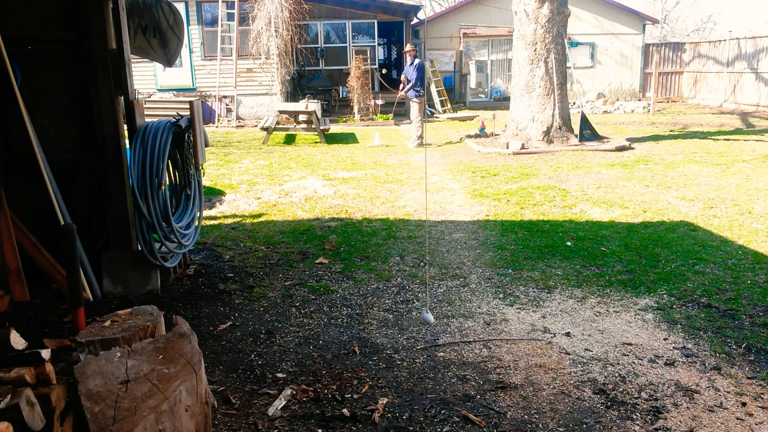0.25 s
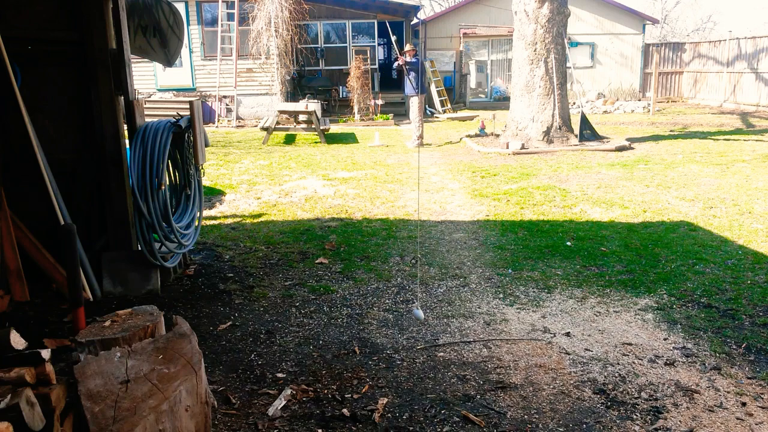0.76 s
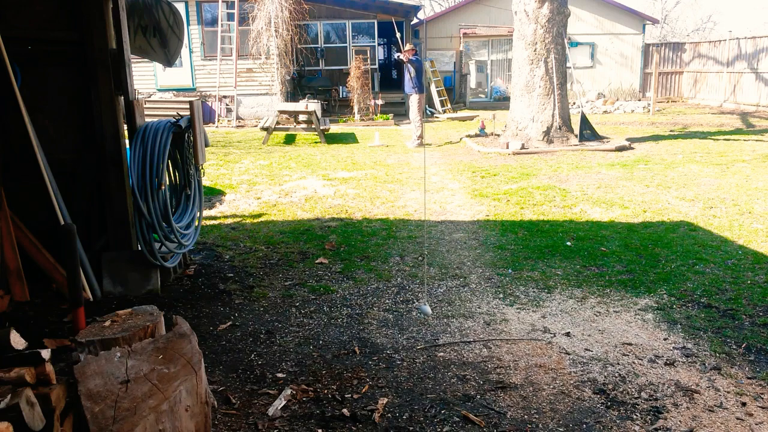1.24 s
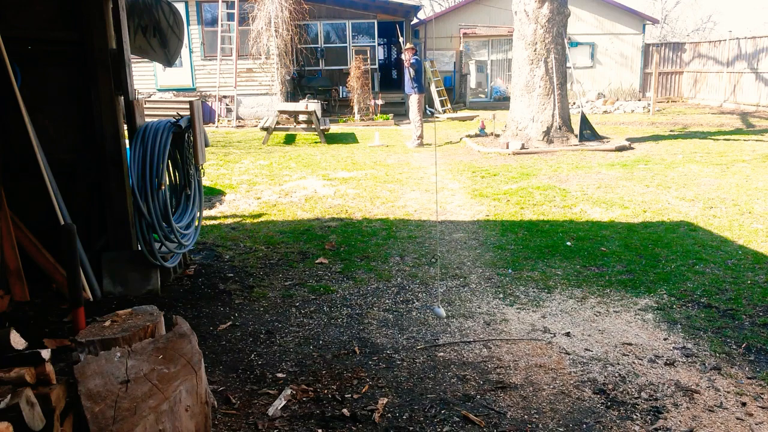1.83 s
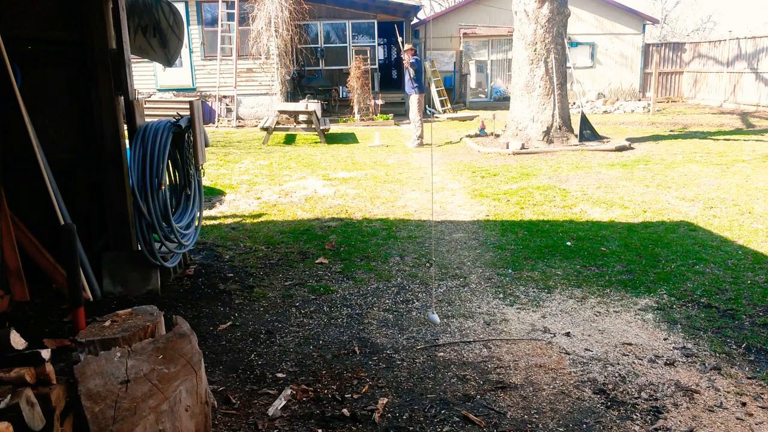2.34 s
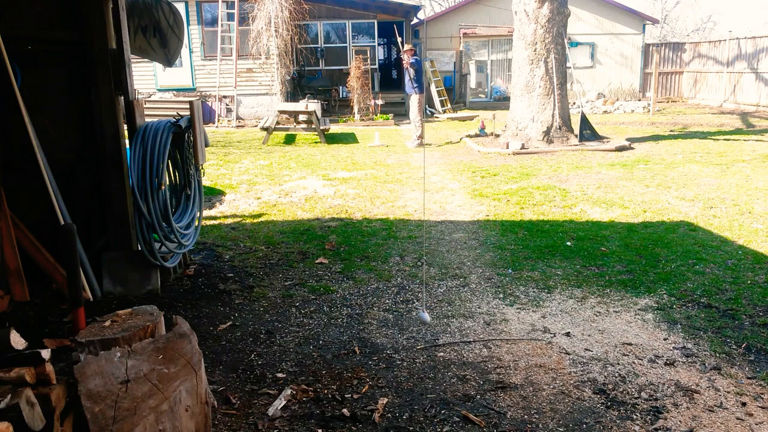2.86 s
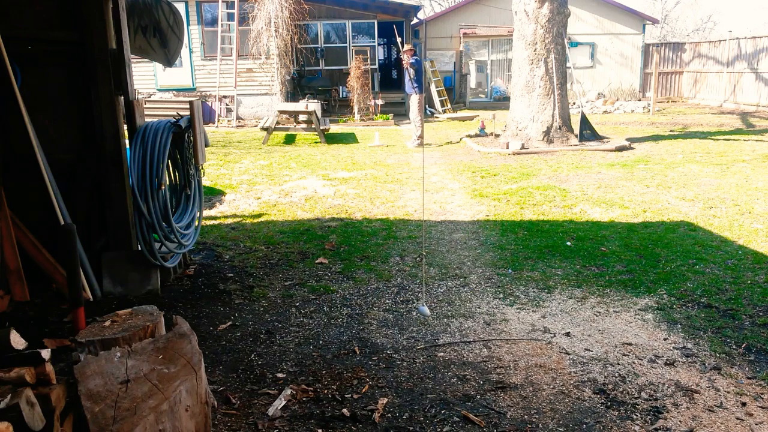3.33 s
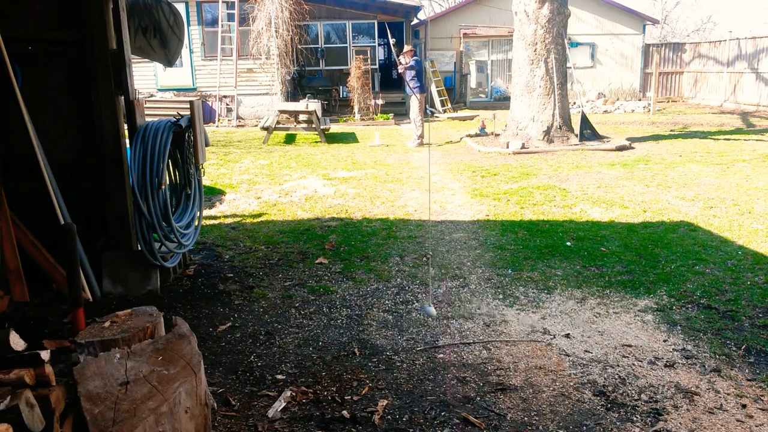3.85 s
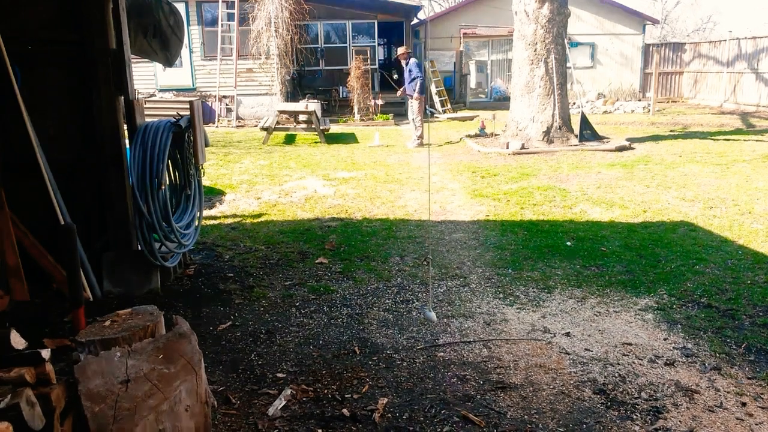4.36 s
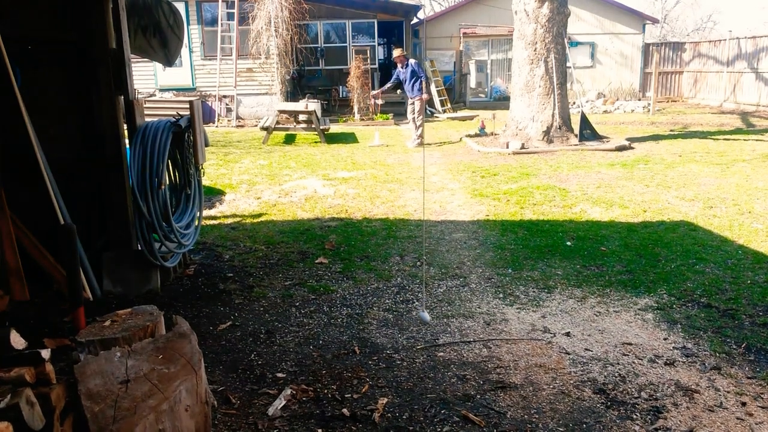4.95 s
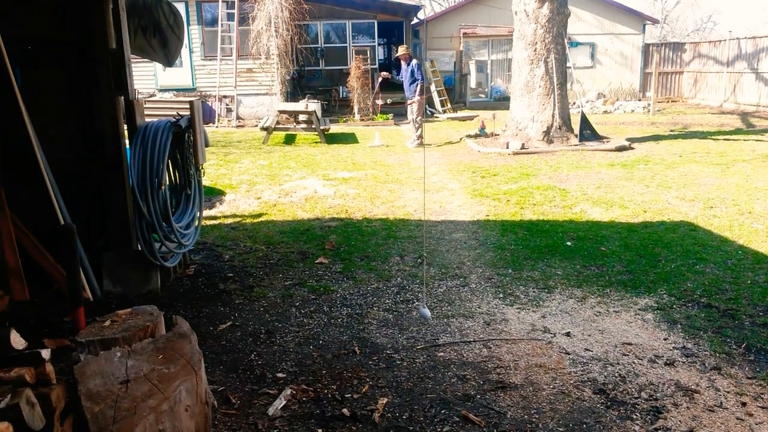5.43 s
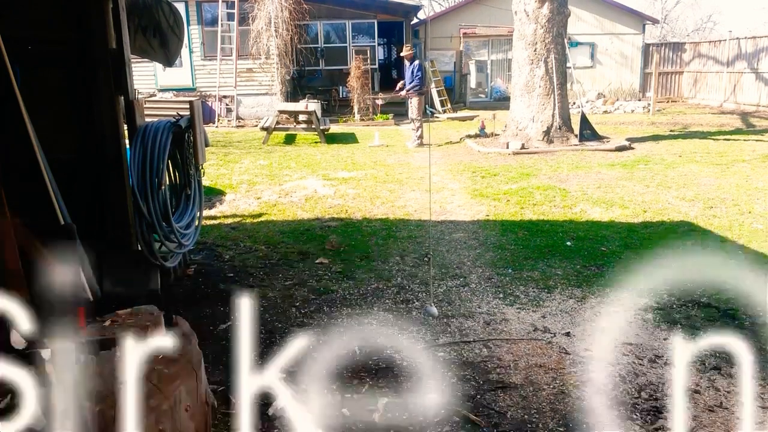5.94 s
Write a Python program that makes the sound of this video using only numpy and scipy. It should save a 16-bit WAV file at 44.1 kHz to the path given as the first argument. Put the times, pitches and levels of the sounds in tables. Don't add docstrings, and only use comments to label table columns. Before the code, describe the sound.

From 0 to 3.7 seconds the yard is very quiet: low distant traffic, a light breeze in leaves, faint rustles, sparse high chirps and squeaks, a soft dove coo from about 2.1 and a hoarse chirp near 2.8. At 3.77 a bow recoils across the yard with a dry string slap. A feathery hiss with a humming shaft swells quickly until 3.95, when the arrow strikes a board beside the microphone: an extremely loud, sharp thud and splintering crack, with a tiny metallic ring and scraping shriek, over within a tenth of a second. Shed walls boom and decay until about 4.5. The board knocks as it rocks, with a clack at 4.09 and a startled bird squeaking and trilling. Grit and dust tick down around 4.2 to 4.8. The dove coos at 4.25 and 4.95, a light tick falls at 5.3, and a last thin bird squeak comes near 5.95.

```python
import sys
import numpy as np
from scipy import signal
from scipy.fft import rfft, irfft, next_fast_len
from scipy.io import wavfile
from scipy.ndimage import uniform_filter1d, map_coordinates

SR = 44100
rng = np.random.default_rng(int(sys.argv[2]) if len(sys.argv) > 2 else 0)


def master_out(mix):
    frames = np.transpose(np.atleast_2d(mix))
    ceiling = np.clip(frames, -1, 1)
    pcm = np.round(ceiling * 32767).astype(np.int16)
    wavfile.write(sys.argv[1], SR, pcm)


def gain_from_db(level_db):
    decades = np.asarray(level_db, float) / 20
    return 10 ** decades


N = 273175
T = np.arange(N) / SR


def unit(x):
    return x / np.sqrt(np.mean(x ** 2) + 1e-20)


def along(points, hz):
    f, v = np.transpose(points)
    return np.interp(np.log(hz + 1), np.log(f + 1), v, right=v[-1])


def curve(points):
    s, v = np.transpose(points)
    return np.interp(T, s, v)


def wobble(rate_hz, size=N):
    knots = rng.standard_normal(int(size * rate_hz / SR) + 4)
    return map_coordinates(knots, [np.arange(size) * rate_hz / SR])


def filtered(x, response):
    m = next_fast_len(N + SR // 2)
    return irfft(rfft(x, m) * response(np.fft.rfftfreq(m, 1 / SR)), m)[..., :N]


def pan(x, left_db):
    return np.array([x * gain_from_db(left_db / 2), x * gain_from_db(-left_db / 2)])


def rush(spectrum, alike, patchy_db):
    z = signal.stft(rng.standard_normal((2, N)), nperseg=512)[2]
    patches = uniform_filter1d(rng.standard_normal(z.shape[1:]), 6, 0)
    patches = unit(uniform_filter1d(patches, 10, 1))
    pair = signal.istft(z * gain_from_db(patchy_db * patches), nperseg=512)[1][:, :N]
    closed = [(10, -120), *spectrum, (spectrum[-1][0] + 900, -120)]

    def mid_side(hz):
        turn = np.arccos(np.clip(along(alike, hz), -1, 1)) / 2
        return gain_from_db(along(closed, hz)) * [np.cos(turn), np.sin(turn)]

    mid, side = filtered(pair, mid_side)
    return unit(np.array([mid + side, mid - side]))


def bursts(rows):
    out = np.zeros(N + SR)
    for s, db, rise, t60, length in rows:
        t = np.arange(round(length * SR)) / SR
        stop = np.clip((length - t) / .0025, 0, 1)
        out[round(s * SR):][:len(t)] += gain_from_db(db - 60 * t / t60) * (1 - np.exp(-t / rise)) * stop
    return out[:N]


def tone(hz, s):
    return np.sqrt(2) * np.sin(2 * np.pi * np.cumsum(hz + 0 * s) / SR)


def notes(rows, rough, left_db):
    out = np.zeros((2, N))
    for s, length, first_hz, last_hz, db in rows:
        n = round(length * SR)
        hz = np.linspace(first_hz, last_hz, n) * (1 + rough * wobble(299.5, size=n))
        swell = signal.windows.tukey(n, min(1, .03 / length))
        swell = swell * gain_from_db(db + 1 + 2.5 * wobble(45, size=n))
        out[:, round(s * SR):][:, :n] += pan(swell * tone(hz, 0), left_db)
    return out


# time in seconds, level in dB.
BREEZE = [(0.0, -57.5), (.67, -59), (.86, -59.5), (1.05, -58), (1.36, -59), (2.0, -57), (2.15, -56),
          (2.31, -59), (2.98, -59), (3.62, -57.5), (5.0, -58.5), (5.4, -56.5), (5.79, -59.5), (5.98, -57),
          (6.19, -56.5)]
# frequency in Hz, left-right correlation.
ALIKE = [(60, 0.99), (180, 0.98), (550, 0.72), (1650, -0.014), (4970, -0.12), (15000, 0.02)]
# frequency in Hz, density in dB per Hz.
TRAFFIC = [(20, -27), (45, -4.5), (70, -0.5), (250, -2), (500, -8.5), (1000, -9.5), (1600, -21.5),
           (3000, -32.5)]
# start in s, level in dB, rise in s, t60 in s, length in s.
ECHO_LOW = [
    (3.5, -53.5, .03, 1.5, 0.25),
    (3.99, -45.5, .03, 1.3, 1),
    (3.96, -54.5, .05, 18, 1.9),
]
# frequency in Hz, density in dB per Hz.
ECHO_TONE = [(40, -20), (90, -0.5), (130, -1), (250, 0.5), (420, -8), (800, -10), (1600, -26.5)]


def traffic():
    road = gain_from_db(curve(BREEZE) + 1 + .4 * wobble(7.7)) * rush(TRAFFIC, [(28, .2), *ALIKE], patchy_db=1.5)
    out = road + bursts(ECHO_LOW) * rush(ECHO_TONE, ALIKE, patchy_db=1.5)
    out[1] = np.roll(out[1], shift=12)
    return out


# frequency in Hz, density in dB per Hz.
LEAVES = [(700, -20), (1500, -1.5), (3000, 2.5), (5000, -2.5), (8000, -3.5), (11000, -5), (14300, -7),
          (14700, -14), (15600, -13.5)]
# start in s, level in dB, rise in s, t60 in s, length in s.
ECHO_HIGH = [
    (3.86, -46, .06, 3.0, .1),
    (3.93, -42.5, .01, 0.77, .4),
    (3.96, -53, .02, 3.6, 1.5),
]


def leaves():
    breeze_db = curve(BREEZE)
    mean_db = breeze_db.mean()
    stir_db = mean_db - 9.5 + 1.2 * (breeze_db - mean_db)
    level = np.hypot(gain_from_db(stir_db), bursts(ECHO_HIGH))
    return level * gain_from_db(.6 * wobble(9)) * rush(LEAVES, ALIKE, patchy_db=1.3)


# start in s, level in dB, rise in s, t60 in s, length in s.
RUSTLE = [(2.08, -58, 0.075, 1.05, 0.29), (2.8, -56, 0.0048, 0.2, 0.06), (1.6, -64, .08, 1.5, .38),
          (3.36, -64, 0.042, 0.7, 0.14), (4.7, -57.5, 0.056, 1.4, 0.26), (5.25, -64, .06, 0.58, .2),
          (.84, -68, 0.033, 0.89, 0.43)]
# frequency in Hz, density in dB per Hz.
RUSTLE_TONE = [(800, -20), (1800, -2.5), (3000, -1.5), (4500, -3), (7000, -16), (10000, -13), (15000, -20)]


def rustles():
    return bursts(RUSTLE) * gain_from_db(2.2 * wobble(60)) * rush(RUSTLE_TONE, [(1000, 0.224)], patchy_db=3)


# start in s, length in s, first Hz, last Hz, level in dB.
LEFT_BIRDS = [(.16, 0.049, 4290, 4080, -67), (.89, .06, 2740, 2830, -77), (1.03, 0.057, 4260, 4280, -68),
              (1.13, 0.19, 5860, 5800, -79), (1.24, .05, 3740, 3800, -73), (1.95, .028, 3420, 3440, -71),
              (2.1, 0.11, 4160, 4360, -80), (5.16, 0.11, 4160, 4140, -70)]
# start in s, length in s, first Hz, last Hz, level in dB.
FAR_BIRDS = [(.27, 0.042, 4330, 4520, -72), (.88, .08, 3100, 3130, -79), (1.13, .1, 4260, 4280, -78),
             (1.645, 0.05, 2050, 1920, -70), (1.77, .2, 2710, 2620, -74), (1.85, .08, 2680, 2640, -74),
             (1.67, .07, 1900, 1990, -75), (1.9, .037, 9790, 9570, -76), (1.92, 0.023, 2090, 2060, -68),
             (2.22, .1, 2680, 2740, -79), (4.325, .025, 8450, 8400, -73), (4.365, .05, 8400, 8440, -74),
             (4.83, .04, 2470, 2510, -70), (4.845, .029, 3000, 3130, -68.5),
             (5.16, .15, 9950, 10020, -75.5)]
# start in s, length in s, first Hz, last Hz, level in dB.
CLEAR_BIRDS = [(2.8, .24, 1527, 1526, -81.5), (2.84, 0.127, 3280, 3200, -78),
               (2.775, 0.31, 3030, 3015, -76), (2.775, .31, 4560, 4500, -80), (3.0, .085, 4520, 4500, -76),
               (2.89, .11, 4850, 4900, -84), (5.9, .045, 6700, 6230, -79), (5.985, .06, 2950, 3480, -75),
               (6.04, .14, 3500, 3680, -81)]
# start in s, length in s, first Hz, last Hz, level
# in dB.
CHATTER = [(.03, 0.12, 255.3, 239.6, -59.5), (1.58, 0.057, 1700, 1790, -76), (1.98, 0.16, 3350, 2780, -77),
           (2.08, 0.21, 3050, 3300, -73.5), (2.1, 0.085, 3650, 3500, -72), (2.08, 0.14, 2600, 2600, -71.5),
           (2.795, 0.044, 2650, 2610, -61), (2.795, 0.04, 3050, 3040, -59), (2.795, 0.04, 3400, 3420, -67),
           (2.8, 0.035, 4550, 4530, -71), (2.8, 0.059, 6810, 6680, -77), (2.797, 0.044, 7840, 7600, -78),
           (4.105, 0.12, 2620, 2596, -68), (5.22, 0.147, 5760, 5730, -74), (6.06, .035, 2496, 2466, -72.5)]


def small_birds():
    left = notes(LEFT_BIRDS, rough=.005, left_db=13.0)
    far = notes(FAR_BIRDS, rough=0.013, left_db=3.0)
    clear = notes(CLEAR_BIRDS, rough=0.0035, left_db=4.0)
    hoarse = notes(CHATTER, rough=.03, left_db=2.5)
    return left + far + clear + hoarse


# start in s, length in s, first Hz, last Hz, level in dB.
DOVE = [
    (2.06, .22, 422, 419, -67.5),
    (2.3, 0.61, 422, 422, -70),
    (4.25, 0.63, 419.5, 417.4, -67.5),
    (4.95, .75, 420.2, 420.4, -71),
]


def dove():
    return notes(DOVE, rough=0.0034, left_db=-0.5)


SQUEAK_DB = [-22, 0, -11, -12]


def squeak(s, length, first_hz, held_hz, db, creep_hz_per_s=1100):
    climb_hz_per_s, swell_db_per_s, fade_db_per_s = 10000, 105, 55
    start = round(s * SR)
    n = min(round(length * SR), N - start)
    t = np.arange(n) / SR
    held = t - (held_hz - first_hz) / climb_hz_per_s
    hz = held_hz + np.where(held < 0, climb_hz_per_s * held, creep_hz_per_s * np.abs(held))
    cycle = np.pi * np.cumsum(hz * (1 + 0.004 * wobble(120, size=n))) / SR
    voice = sum(gain_from_db(h) * np.sin((k + 1) * cycle) for k, h in enumerate(SQUEAK_DB))
    edges = np.clip(np.minimum(t, length - t) / .012, 0, 1)
    effort_db = db + np.minimum(swell_db_per_s * held, -fade_db_per_s * held)
    effort_db = effort_db + 0.5 + 2.4 * wobble(50, size=n)
    call = pan(voice * edges * gain_from_db(effort_db), 2 + 4.0 * wobble(7.3, size=n))
    return np.pad(call, [(0, 0), (start, N - n - start)])


# start in s, length in s, first Hz, held Hz (both of harmonic 2), level in dB.
SQUEAKS = [
    (.24, .06, 6700, 6990, -68),
    (.52, .2, 7300, 7760, -81),
    (3.635, .125, 6760, 7480, -70),
    (4.09, .122, 6800, 7000, -54),
    (4.34, .165, 6930, 7060, -62.5),
    (5.932, .255, 6280, 7370, -67),
]


def squeaky_bird():
    tired = squeak(1.995, .27, 6500, 7550, -69, creep_hz_per_s=-650)
    return sum(squeak(*row) for row in SQUEAKS) + tired


# start in s, length in s, first Hz, last Hz, level in dB.
TRILL = [
    (4.105, .43, 2650, 2627, -64),
]


def startled_bird():
    return gain_from_db(2.5 * wobble(80)) * notes(TRILL, rough=0.012, left_db=0.1)


# start in s, level in dB, rise in s, t60 in s, length in s.
SHOVE = [
    (3.77, -53.5, .01, .6, .2),
    (3.955, -50.5, .01, .9, .5),
]
# frequency in Hz, density in dB per Hz.
SHOVE_TONE = [(22, -6.5), (40, 0), (65, 0.5), (100, -14)]


def air_shove():
    return bursts(SHOVE) * rush(SHOVE_TONE, [(40, .1)], patchy_db=0.0)


# start in s, peak in dB, stone in Hz, left minus right in dB.
GRIT = [(3.7792, -16, 1010, -3), (3.7775, -24, 7400, 0), (4.0912, -26, 4960, 24.5),
        (4.1975, -37, 12500, -2), (4.1995, -36, 6500, 4), (4.2118, -40, 8000, 0),
        (4.218, -35.5, 10500, -2.5), (4.2323, -29.5, 6400, 0), (4.2362, -29, 5200, 3),
        (4.5093, -46.5, 11100, -7), (4.194, -39, 7000, 0), (4.2265, -43.5, 10000, 0),
        (4.262, -41.5, 7000, 0), (4.272, -43, 7200, 0), (4.2377, -27, 7300, 6.5), (4.2428, -29.5, 8000, -1),
        (4.2525, -35.5, 7000, 2), (4.3675, -45.5, 8000, 3), (4, -40.5, 6700, 2), (4.555, -48, 13000, 0),
        (4.58, -50, 9000, 0), (4.74, -54, 10000, 0), (4.5243, -38.5, 8450, -5), (4.6158, -33.5, 8200, -7),
        (4.661, -39, 7800, -6.5), (4.678, -42.5, 7700, -6), (4.7208, -43, 5800, 5.5),
        (4.7935, -44, 12640, -6), (4.963, -48.5, 8200, 1), (4.857, -51, 12000, 0),
        (3.9628, -8.5, 6000, -0.5), (5.3366, -42, 4000, 17), (5.337, -42, 1500, 15),
        (5.9, -44.5, 6500, 2.5), (4.0015, -20.5, 7000, 0), (.285, -51, 4500, 0)]
# start in s, level in dB, rise in s, t60 in s, length in s.
TRICKLE = [(4.19, -51.5, 0.0116, 0.66, 0.074), (4.36, -61.5, 0.0028, .5, 0.04),
           (4.5, -61, .01, 0.65, 0.097), (4.607, -56.5, .005, 0.21, .022), (4.655, -58, 0.0051, .3, .035),
           (4.715, -66, 0.0059, 0.35, .06), (.8, -69.5, 0.037, 2.2, .3), (5.17, -66, 0.064, 3.4, 0.19)]
# frequency in Hz, density in dB per Hz.
TRICKLE_TONE = [(2500, -7), (5000, -3.5), (8000, 0.5), (12000, -6.5), (15500, -8)]


def grit():
    out = np.zeros((2, N))
    t = np.arange(SR // 40) / SR
    for s, db, hz, left_db in GRIT:
        noise = uniform_filter1d(rng.standard_normal((2, len(t))), size=2)
        noise = signal.lfilter([1, -.6], 1, noise)
        click = gain_from_db(-60 * t / 0.0019) * (1 - np.exp(-t / 0.00021)) * np.sin(2 * np.pi * hz * t)
        crack = gain_from_db(-12.0 - 60 * t / .004) + gain_from_db(-20 - 60 * t / .03)
        out[:, round(s * SR):][:, :len(t)] += gain_from_db(db + 4) * (pan(click, left_db) + crack * noise)
    dust = bursts(TRICKLE) * gain_from_db(2.5 * wobble(500)) * rush(TRICKLE_TONE, [(5000, .3)], patchy_db=2)
    return out + dust


# start in s, level in dB, rise in s, t60 in s, length in s.
BOOM = [
    (3.96, -35, 0.0045, .2, 0.077),
    (4.02, -41, .005, 0.682, .5),
]
# frequency in Hz, density in dB per Hz.
BOOM_TONE = [(70, -22), (105, -6), (132, 0), (165, -10), (300, -15), (600, -26)]


def wall_boom():
    return bursts(BOOM) * rush(BOOM_TONE, ALIKE, patchy_db=-2.0)


# time in s, peak in dB, frequency in Hz, half length in s.
THUD = (3.9552, -6.5, 440, .00095)
# time in s, peak in dB, frequency in Hz, half
# length in s.
KNOCKS = [(3.979, -26, 245, 0.0083), (3.985, -29, 450, .005), (3.995, -32, 108, .014),
          (4.003, -29, 345, 0.0055), (4.028, -28, 135, .006), (4.056, -34, 150, .01),
          (4.1, -40, 150, 0.013), (4.172, -35, 150, .008), (4.26, -44, 140, .012)]
# frequency in Hz, level in dB, t60 in s.
BOARD = [
    (247, -32.5, 0.1),
    (335, -27.5, 0.06),
    (463.6, -27.5, 0.04),
]


def thud():
    out = 0
    for s, db, hz, half in [THUD, *KNOCKS]:
        out = out + gain_from_db(db) * np.cos(2 * np.pi * hz * (T - s)) * np.exp(-((T - s) / half) ** 2 / 2)
    t = np.clip(T - THUD[0], 0, None)
    for hz, db, t60 in BOARD:
        out = out + gain_from_db(db - 60 * t / t60) * np.sin(2 * np.pi * hz * t)
    return out


# frequency in Hz, left-right correlation.
ALIKE_NEAR = [(60, 0.65), (180, 0.29), (550, 0.31), (1650, 0.2), (4970, 0.17), (15000, 0.06)]
# start in s, level in dB, rise in s, t60 in s, length in s.
BOW = [
    (3.757, -43.5, 0.0006, 0.32, .02),
    (3.768, -41.5, 0.0036, 0.23, 0.017),
    (3.7735, -27.5, 0.0018, .35, .3),
    (3.81, -31.5, 0.0069, 0.13, .1),
]
# frequency in Hz, density in dB per Hz.
BOW_TONE = [(60, -21.5), (150, 0.5), (400, -12.5), (900, -8.5), (2000, -11.5), (4200, -9), (7000, -10.5),
            (10000, -18.5), (15500, -21.5)]


def bow():
    return bursts(BOW) * gain_from_db(1.8 * wobble(300)) * rush(BOW_TONE, ALIKE_NEAR, patchy_db=2.5)


# time in s, level in dB.
FLIGHT = [(3.79, -51), (3.84, -36), (3.885, -31.5), (3.92, -27), (3.953, -24.5), (3.957, -24.5)]
# frequency in Hz, density in dB per Hz.
FEATHER = [(100, -8.5), (400, -11), (1000, -10), (2500, -10), (5000, -8), (8000, -8), (9500, -14),
           (15500, -19.5)]


def feather_hiss():
    flying = (T > FLIGHT[0][0]) * (T < FLIGHT[-1][0])
    return flying * gain_from_db(curve(FLIGHT) + 2 * wobble(300)) * rush(FEATHER, ALIKE_NEAR, patchy_db=2)


def modes(rows, damp_db_per_s):
    loosed_s, wake_s, beat_depth = 3.8, .04, .38
    sag_per_s = .25
    t, out = loosed_s + np.arange(SR // 4) / SR, 0
    for hz, s, db, swell, beat in rows:
        level_db = db + np.minimum(swell * (t - s), -damp_db_per_s * (t - s))
        level_db = level_db + 1.5 * wobble(120, size=len(t))
        spin = (1 + beat_depth * np.cos(2 * np.pi * beat * (t - s))) / (1 + beat_depth)
        pitch = hz * (1 - sag_per_s * (t - 3.9) + .005 * wobble(60, size=len(t)))
        out = out + gain_from_db(level_db) * spin * tone(pitch, t)
    start = round(loosed_s * SR)
    return np.pad(out * np.clip((t - loosed_s) / wake_s, 0, 1), (start, N - start - len(t)))


# Hz, loudest at s, level in dB, swell in dB per s, beats per s.
SHAFT = [(645, 3.936, -38, 280, 0), (672, 3.964, -22.5, 1200, 0), (985, 3.944, -30.5, 60, 18),
         (1355, 3.947, -30.5, 115, 25), (1370, 3.98, -39, 150, 0), (1810, 3.958, -41, 50, 15),
         (2130, 3.973, -25, 900, 0), (2070, 3.995, -30, 900, 0)]


def shaft_hum():
    hum = modes(SHAFT, damp_db_per_s=1000)
    return np.array([hum, np.roll(hum, shift=4)])


# Hz, loudest at s, level in dB, swell in dB per s, beats per s.
TIP = [
    (3900, 3.961, -26, 1300, 0),
    (6330, 3.9615, -19, 1500, 0),
    (7230, 3.9585, -21, 3000, 0),
]


def tip_ring():
    return modes(TIP, damp_db_per_s=2600)


# start in s, level in dB, rise in s, t60 in s, length in s.
SHRIEK = [
    (3.9562, -16, .0004, .3, .0065),
    (3.962, -22, .0004, .13, .041),
]
# frequency in Hz, density in dB per Hz.
SHRIEK_TONE = [(5200, -27), (6250, 0), (6600, -8.5), (7050, -3), (7700, -11), (8800, -30)]


def shriek():
    return bursts(SHRIEK) * rush(SHRIEK_TONE, [(7000, 0.35)], patchy_db=0.0)


# start in s, level in dB, rise in s, t60 in s, length in s.
CRASH = [
    (3.9532, -14.5, .0004, 0.035, 0.0064),
    (3.9562, -11.5, .0005, 0.077, 0.031),
    (3.968, -20.5, .002, 0.24, 0.038),
    (4.0, -34, .003, .4, .4),
    (4.088, -37, .002, 0.029, .05),
]
# frequency in Hz, density in dB per Hz.
CRASH_TONE = [(80, -19.5), (250, -12), (600, -8.5), (1200, -12.5), (2500, -10), (4000, -8), (6000, -11),
              (9000, -11.5), (15500, -18.5)]


def crash():
    return bursts(CRASH) * gain_from_db(2.3 * wobble(900)) * rush(CRASH_TONE, ALIKE_NEAR, patchy_db=1.5)


# frequency in Hz, t60 in s.
SHED = [(80, 0.88), (140, 0.93), (220, 0.66), (600, 0.21), (2100, .2), (3500, 0.55), (12000, 0.26)]


def shed(x):
    hz, t, z = signal.stft(rng.standard_normal((2, SR)), SR, nperseg=512)
    z[1, :8] = z[0, :8]
    tail = signal.istft(z * gain_from_db(-60 * t / along(SHED, hz)[:, None]), SR, nperseg=512)[1]
    tail = tail / np.linalg.norm(tail[0])
    late = np.pad(x, (300, 0))[None]
    return signal.fftconvolve(late, tail, axes=1)[:, :N]


# frequency in Hz, left minus right in dB.
SIDE_NEAR = [(60, 2), (150, -1), (380, 0.5), (950, -1.0), (2380, 1), (5980, 2.5), (15000, -5.5)]


def scene():
    arrow = bow() + feather_hiss() + shaft_hum() + tip_ring() + crash() + shriek()

    def placed(hz):
        low_cut = (1j * hz / (60 + 1j * hz)) ** 2
        return gain_from_db(along(SIDE_NEAR, hz) / 2 * [[1], [-1]]) * low_cut

    near = filtered(arrow + thud() + wall_boom(), placed)
    song = small_birds() + dove() + squeaky_bird()
    sent = near + gain_from_db(7) * song
    room = gain_from_db(-14.5) * shed(sent.mean(axis=0))
    yard = traffic() + leaves() + rustles()
    return near + song + room + grit() + yard + startled_bird() + air_shove()


def roll_off(x):
    return signal.sosfilt(signal.butter(12, 15610, fs=SR, output="sos"), x)


# centre in Hz, width in Hz, gain in dB.
PORT = (7200, 1500, 5)


def record(dry):
    centre_hz, width_hz, db = PORT

    def port(hz):
        damped = 1j * hz * width_hz
        return 1 + gain_from_db(db) * damped / (centre_hz * centre_hz - hz * hz + damped)

    x = filtered(dry, port)
    x = x / (1 + np.abs(x) ** 8) ** (1 / 8)
    x = filtered(x, lambda hz: hz < 15700)
    return roll_off(x)


dry = scene()
out = record(dry)
master_out(out)
```